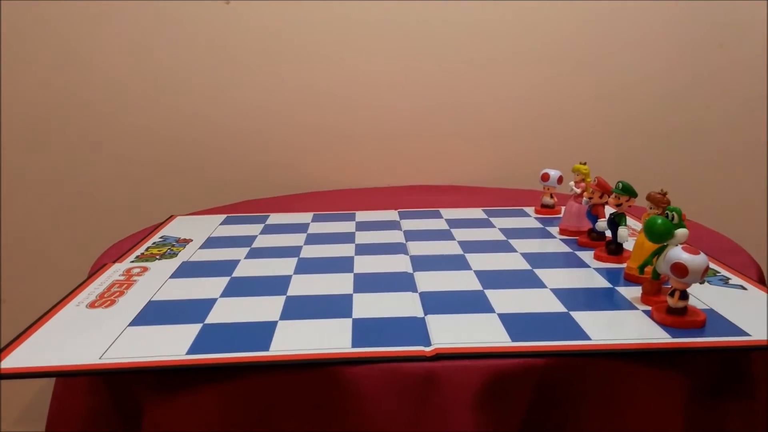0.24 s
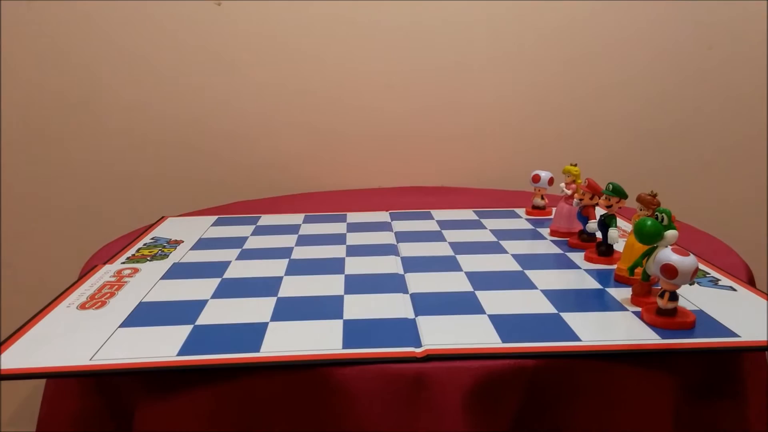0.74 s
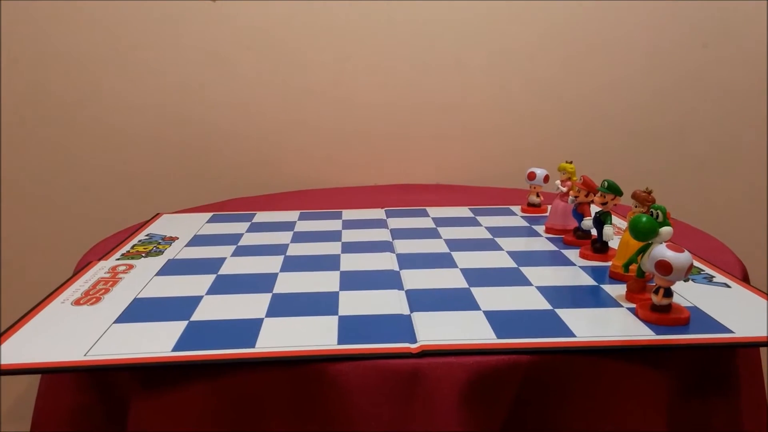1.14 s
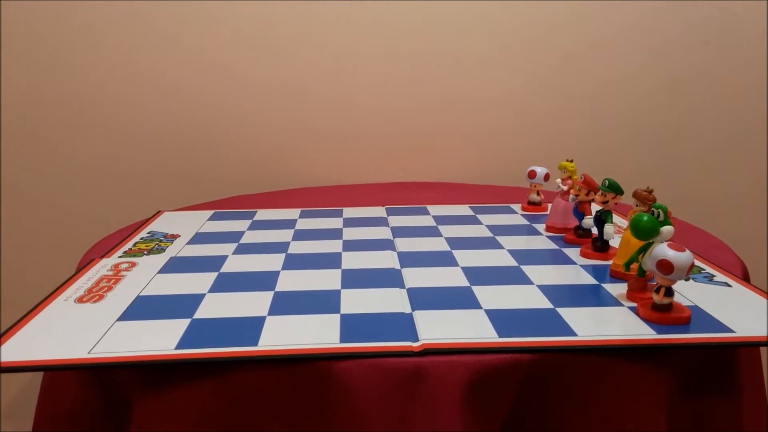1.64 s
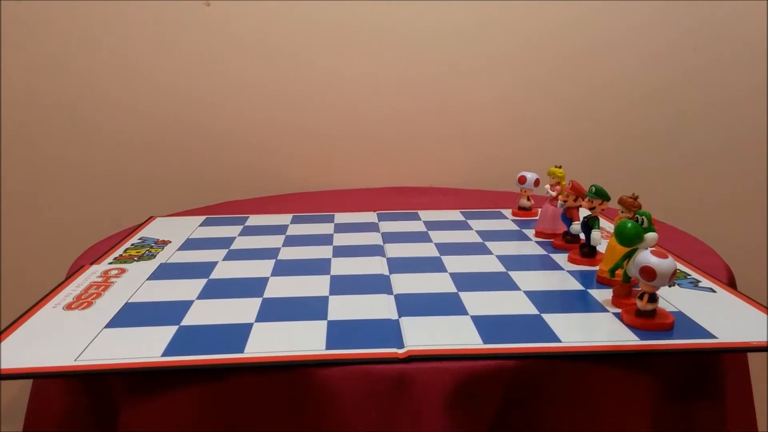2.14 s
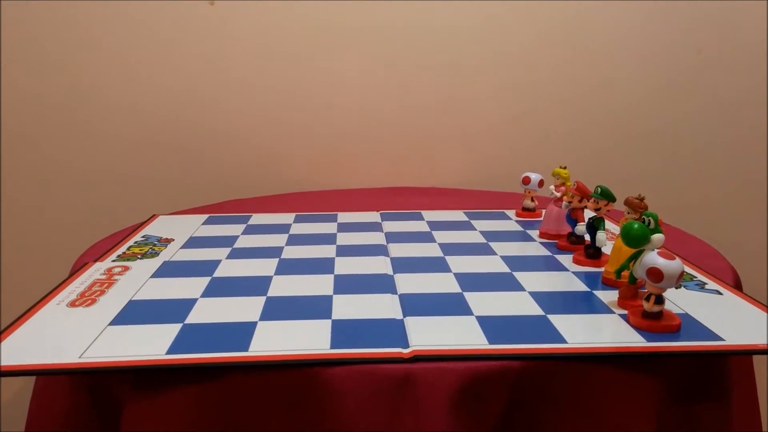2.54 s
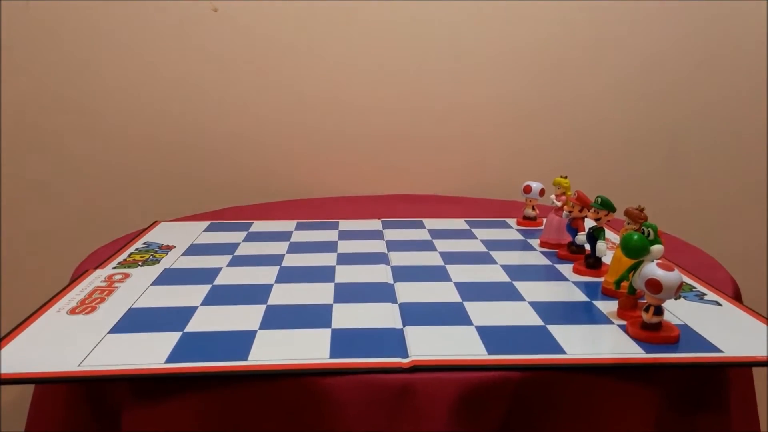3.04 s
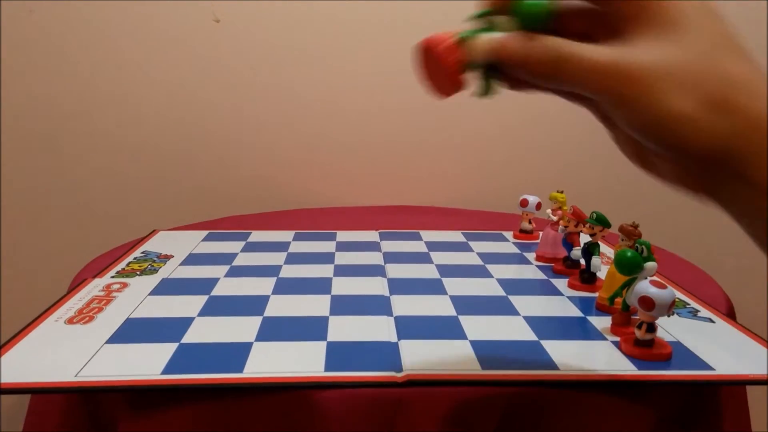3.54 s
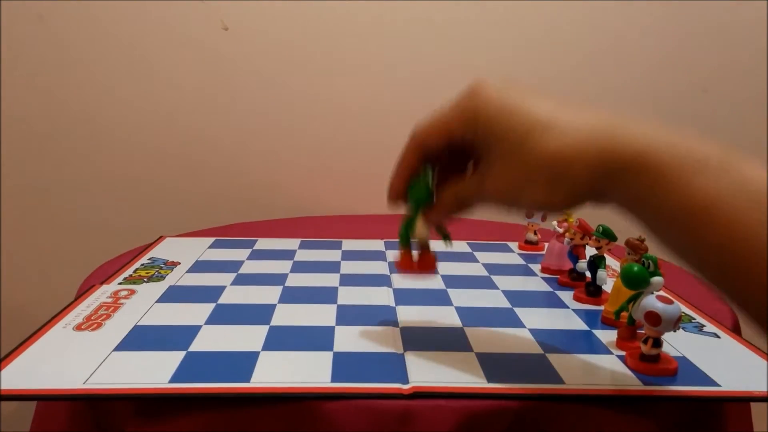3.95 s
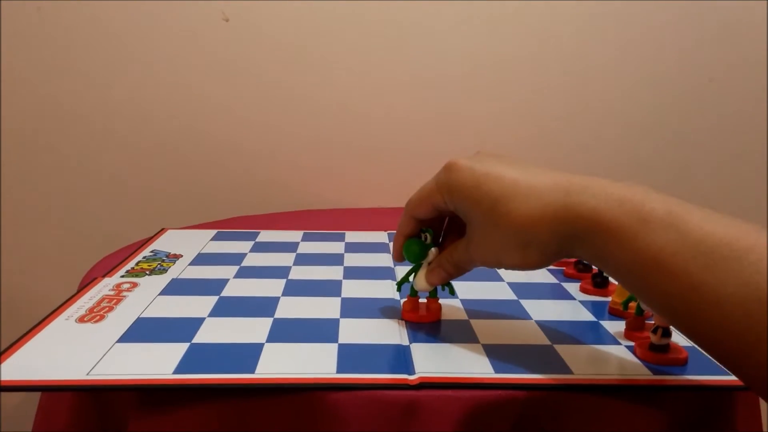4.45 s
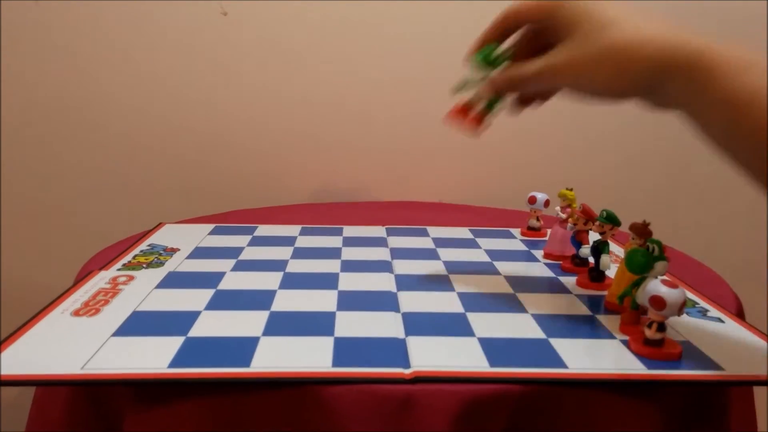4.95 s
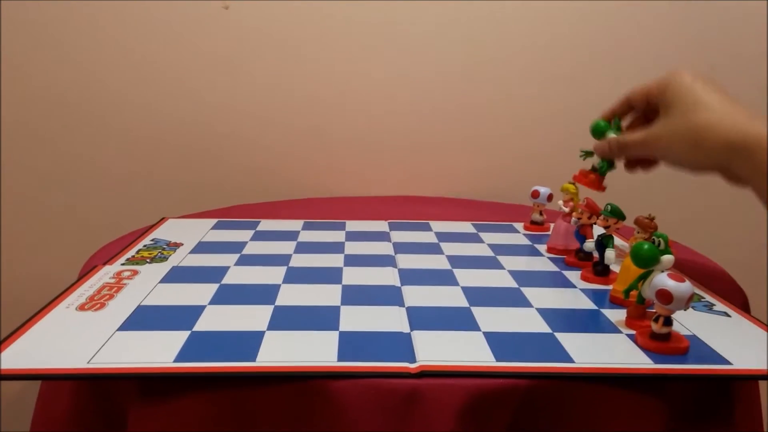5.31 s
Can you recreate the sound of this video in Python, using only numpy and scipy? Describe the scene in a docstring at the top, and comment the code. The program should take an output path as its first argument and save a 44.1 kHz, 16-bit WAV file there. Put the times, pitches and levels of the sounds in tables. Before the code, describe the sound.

A small quiet room with faint low air and soft hiss, picked up closely in stereo. From 0 to 0.5 s, dull fleshy bumps on a camera case mix with a weak scrape and small clicks. At about 0.6 s a hollow plastic piece clicks on a folding board, with more sharp clicks and a tiny clink at 0.8-0.95 s. From 1.05 to 1.45 s a base drags scratchily, catching in little ticks; a cluster of clicks follows around 1.5-1.7 s. The loudest knock lands at 1.74 s, hard and woody, rattling until 1.85 s. Light taps and scrapes come near 2.0-2.1 s, then near quiet, with barely audible thin whistles. Soft bumps return at 2.9 and 3.3 s, low thumps around 3.85 s. At 4.34 s a piece taps down, duller and slightly left. Gentle bumps follow near 4.8-4.95 s, and a stronger hollow handling bump closes at 5.5 s.

```python
"""Soft scrapes of sliding bases and dull hand bumps on a camera case open over quiet room air.
Hollow plastic chess figurines then click about a folding board; one knocks down hard and rattles,
and later one is tapped onto a square. Catches flick the board, clinks ping, and faint whistles arch by.
Hits are decaying modes with noise cracks, slides are trains of tiny slips that ring the board,
whistles are gliding sines, and a small room answers with early echoes and a diffuse tail."""
import sys
import numpy as np
from scipy import signal
from scipy.fft import rfft, irfft, next_fast_len
from scipy.io import wavfile
from scipy.ndimage import uniform_filter1d

SR = 44100
rng = np.random.default_rng(int(sys.argv[2]) if len(sys.argv) > 2 else 0)


def materialize(psi):
    """Save the field psi as 16-bit PCM at rate SR to the path in sys.argv[1].

    A 1-D psi becomes a single channel; in a 2-D psi each row is a channel.
    """
    bounded = np.clip(np.atleast_2d(psi).T, -1, 1)
    quanta = np.round(bounded * 32767).astype(np.int16)
    wavfile.write(sys.argv[1], SR, quanta)


N = 245945  # length of the scene [samples]
RING_T = np.arange(4096) / SR  # time axis of a single hit [s]
BLOW_S = 0.01  # opening stretch over which a hit's level is set [s]


def amp(db):
    """Turns decibels into gain."""
    return 10 ** (np.asarray(db) / 20)


def evened(x):
    """Scales a signal to unit rms."""
    return x / np.sqrt(np.mean(x ** 2) + 1e-30)


def blow(x):
    """Scales a hit to unit rms over its first moments."""
    opening = x[..., :int(BLOW_S * SR)]
    return x / np.sqrt(np.mean(opening ** 2) + 1e-30)


def read(points, hz):
    """Reads a table on a log-frequency axis."""
    f, value = np.transpose(points)
    return np.interp(np.log(hz + 1), np.log(f + 1), value)


def add(mix, s, sound):
    """Mixes a sound in at time s [s]."""
    part = mix[:, max(round(s * SR), 0):][:, :sound.shape[1]]
    part += sound[:, :part.shape[1]]


def pair(x, colour, likeness, tilt_db=0):
    """Colours two unrelated signals and blends them into what two close microphones hear."""
    size = next_fast_len(x.shape[1], True)
    a, b = rfft(x, size)
    hz = np.fft.rfftfreq(size, 1 / SR)
    same = np.clip(read(likeness, hz), 0, 1)
    # the tilt [dB/octave] acts above 7 kHz
    top_db = tilt_db * np.log2(np.maximum(hz / 7000, 1))
    gain = amp(read(colour, hz) + top_db)
    blended = same * a + np.sqrt(1 - same ** 2) * b
    return irfft(np.array([a, blended]) * gain, size)[:, :x.shape[1]]


# left-right likeness of sounds close by: (frequency [Hz], likeness [0-1])
NEAR_LIKENESS = [(150, 0.94), (700, 0.94), (1500, 1), (4000, 0.33), (9000, 0.1), (16000, 0.29)]


def ring(modes, emphasis_db=0, contact_s=0.00014, scatter=0.00395):
    """One blow on decaying modes; their shares, signs and tuning vary from blow to blow."""
    hz, db, t60 = np.transpose(modes)
    share, sign, detune, apart = rng.standard_normal((4, len(modes)))
    size = amp(db + emphasis_db + 1.2 * share) * np.sign(sign)
    # high modes reach the two microphones out of step
    skew = apart * np.sqrt(-0.5 * np.log(np.clip(read(NEAR_LIKENESS, hz), 0.05, 1)))
    poles = 2j * np.pi * hz * (1 + scatter * detune) - np.log(1000) / t60
    swings = np.vander(np.exp(poles / SR), len(RING_T), increasing=True)
    phased = size * np.exp(1j * np.array([skew, -skew]))
    sound = np.einsum("cm,mt->ct", phased, swings).imag
    return blow(sound * (1 - np.exp(-(RING_T / contact_s) ** 2)))


def burst(colour, rise_s, fall_s, tilt_db=0):
    """A short crack of coloured noise; the tilt dulls or brightens its top."""
    noise = pair(rng.standard_normal((2, len(RING_T))), colour, NEAR_LIKENESS, tilt_db)
    rise = 1 - np.exp(-(RING_T / rise_s) ** 2)
    return blow(noise * rise * np.exp(-RING_T / fall_s))


# where the pieces are: (time [s], lead of the left microphone [ms], left over right [dB])
PIECE_PLACES = [(0.498, .19, 0), (2.1, .19, 0), (4.3, .03, 3)]


def placed(sound, s):
    """The nearer microphone hears a piece sooner, and louder where the level leans."""
    times, lead_ms, pan_db = np.transpose(PIECE_PLACES)
    lag = round(abs(np.interp(s, times, lead_ms)) * SR / 1000)
    gain = amp(np.interp(s, times, pan_db) / 2)
    late = np.pad(sound[1], (lag, 0))[:sound.shape[1]]
    return np.array([sound[0] * gain, late / gain])


def octaves(modes, hz):
    """How far each mode lies above a pitch [octaves]."""
    return np.log2(np.transpose(modes)[0] / hz)


AIR_DB = -65.5  # overall rms level of the air [dB]
# spectrum of room air and microphone hiss: (frequency [Hz], relative level [dB per Hz])
AIR_SPECTRUM = [(12, -34.5), (20, -3), (33, -21), (86, -1.5), (182, -7), (260, -3), (350, -2.5),
                (558, -5.5), (738, -7), (976, -9), (1440, -10.5), (1910, -10), (3250, -13), (8410, -22),
                (9400, -23), (16000, -32)]
# left-right likeness of the air: (frequency [Hz], likeness [0-1])
AIR_LIKENESS = [(30, 0.4), (100, 0.5), (300, 0.52), (800, 0), (2000, 0), (8000, 0.01)]


def air():
    """Steady room air and microphone hiss, as shaped noise."""
    return amp(AIR_DB) * evened(pair(rng.standard_normal((2, N)), AIR_SPECTRUM, AIR_LIKENESS))


# rise and fall of a stroke [shares of its length]
STROKE_RISE, STROKE_FALL = 0.41, 0.24
# bases sliding and fingers rubbing on the figures:
# (start [s], length [s], scrape level before trim [dB], hiss level before trim [dB])
SLIDE_STROKES = [(0.01, 0.53, -66.5, -83), (0.769, 0.27, -56.5, -82), (0.998, 0.086, -69, -83),
                 (1.045, 0.41, -52, -64.5), (1.422, 0.21, -53, -70), (1.627, 0.14, -56, -80),
                 (1.974, 0.25, -61, -74.5), (2.15, 0.223, -68.5, -84), (2.808, 0.23, -73, -72),
                 (3.266, 0.11, -74, -76), (3.52, 0.99, -70, -74)]


def strokes():
    """Levels of scrape and hiss as each stroke gathers speed, holds and slows."""
    t, gains = np.arange(N) / SR, np.zeros((2, N))
    for s, length, scrape_db, hiss_db in SLIDE_STROKES:
        u = (t - s) / length
        swell = np.clip(np.minimum(u / STROKE_RISE, (1 - u) / STROKE_FALL), 0, 1)
        gains += amp([[scrape_db], [hiss_db]]) * swell
    return gains


# a sliding base wanders over spots between these pitches [Hz]
SLIDE_LOW_HZ, SLIDE_HIGH_HZ = 700, 1600
# modes of the folding board: (frequency [Hz], relative level [dB], decay time t60 [s])
BOARD_MODES = [(412, -3, 0.15), (468, 2.5, 0.063), (543, -1.5, 0.096), (627, 0, .045), (732, 1, 0.052),
               (847, -0.5, 0.027), (983, -0.5, 0.026), (1173, 2.5, 0.025), (1330, 3, 0.022),
               (1393, 0.5, 0.018), (1537, -3.5, 0.03), (1605, -1.5, 0.026), (1740, -7.5, 0.023),
               (1844, -12, 0.016)]


def wandering_board(grain, focus_db=16, count=6):
    """The slips ring the board, whose strongest modes change as the base travels from spot to spot."""
    wander = evened(uniform_filter1d(rng.standard_normal(N), size=1100))
    spot = np.clip(np.round((count - 1) * (0.5 + 0.35 * wander)), 0, count - 1)
    total = np.zeros((2, N))
    for k, hz in enumerate(np.geomspace(SLIDE_LOW_HZ, SLIDE_HIGH_HZ, count)):
        sound = ring(BOARD_MODES, -focus_db * abs(octaves(BOARD_MODES, hz)), scatter=0.0077)
        total += signal.oaconvolve(grain * (spot == k), sound, axes=1)[:, :N]
    return evened(total)


SLIPS_PER_S = 1000  # mean rate of the tiny slips [1/s]
# spectrum of the scrape: (frequency [Hz], relative level [dB per Hz])
SCRAPE_SPECTRUM = [(88, -48.5), (150, -8.5), (235, -14.5), (325, 8.5), (409, -30.5), (449, -0.5),
                   (592, -2.5), (650, 2.5), (794, -3), (927, 5), (1260, -9), (2070, -5.5), (6000, -28),
                   (7800, -52), (13200, -120)]
# spectrum of the fine rubbing hiss: (frequency [Hz], relative level [dB per Hz])
HISS_SPECTRUM = [(1500, -8.5), (3500, 1), (5000, 0), (7500, -4), (9400, 3.5), (11000, -2.5), (16000, -7)]
# left-right likeness of diffuse sound, for the hiss and the room: (frequency [Hz], likeness [0-1])
ROOM_LIKENESS = [(150, 0.94), (500, 0.9), (1200, 0.29), (2500, 0.047), (16000, 0.0093)]


def slides(spread_db=2.7, catch_db=1.7, ring_db=-1):
    """Tiny slips of uneven size set the board ringing, with a fine hiss from the rubbing surfaces."""
    scrape_gain, hiss_gain = strokes()
    # the slips swell and weaken as the bases catch and let go
    catch = amp(catch_db * evened(uniform_filter1d(rng.standard_normal(N), size=500)))
    slip_size = amp(spread_db * np.minimum(rng.exponential(1, N), 4))
    slips = (rng.random(N) < SLIPS_PER_S / SR) * slip_size
    grain = evened(slips * catch * rng.standard_normal((2, N)))
    rough = grain + 0.45 * catch * rng.standard_normal((2, N))
    rub = evened(pair(rough, SCRAPE_SPECTRUM, NEAR_LIKENESS))
    scrape = evened(rub + amp(ring_db) * wandering_board(grain[:1]))
    fine = grain + 1.5 * rng.standard_normal((2, N))
    hiss = evened(pair(fine, HISS_SPECTRUM, ROOM_LIKENESS))
    # the trims set scrape against hiss
    return placed(amp(-0.5) * scrape_gain * scrape + amp(5.0) * hiss_gain * hiss, 0)


# a bump's second push: delay [s] and pitch ratio; the skin's rub against the case note [dB]
SETTLE_S, SETTLE_PITCH, RUB_DB = 0.011, 0.953, -8.5
# modes of the camera case, before the grip shifts them: (frequency [Hz], relative level [dB], t60 [s])
CASE_MODES = [(380, -7, .03), (442, 0, .055), (495, -2, .03), (590, -10, .02)]
# modes of the low thump: (frequency [Hz], relative level [dB], t60 [s])
THUMP_MODES = [(132, -15, 0.082), (158.5, 9, 0.069), (246, 6, 0.059)]
# spectrum of skin rubbing the case: (frequency [Hz], relative level [dB per Hz])
RUB_SPECTRUM = [(300, -35), (800, 7), (1250, 6.5), (2000, -4), (4000, -9.5), (9000, -19), (16000, -23)]
# dull bumps of the hand on the camera:
# (time [s], case level [dB], thump over case [dB], settling of the grip over case [dB], pitch [ratio])
HAND_BUMPS = [(0.017, -53, -14, -14, 1), (0.087, -51.5, -12, -10, 1), (0.147, -58, -12, 4.5, 1),
              (0.204, -51.5, -23, -1, 1), (0.399, -64, -6, 0, 0.93), (0.483, -60, -15, 0, 1),
              (2.88, -66, -14, 0, 0.93), (3.32, -63, -12, -1.5, 0.75), (3.75, -65.5, -3, -1, 0.71),
              (3.851, -50.5, 12.5, -3.5, 1), (3.898, -53, 1, -13, 1), (4.11, -58.5, -5.5, -8, 0.94),
              (4.219, -64, 4, -2, 0.75), (4.821, -57.5, -12, -22, 1), (4.945, -60, -20, 1, 0.73),
              (5.513, -41.5, -26, 4, 0.95), (5.555, -48.5, -19.5, 11.5, 0.91)]


def bumps():
    """Soft flesh hardly reaches the treble: the case notes hollowly, then lower as the grip settles."""
    out = np.zeros((2, N))
    for s, case_db, thump_db, settle_db, grip in HAND_BUMPS:
        rub = burst(RUB_SPECTRUM, rise_s=0.0008, fall_s=0.009)
        add(out, s, amp(case_db + RUB_DB) * rub)
        pushes = (0, case_db, grip), (SETTLE_S, case_db + settle_db, grip * SETTLE_PITCH)
        for after_s, db, pitch in pushes:
            thump = amp(thump_db) * ring(THUMP_MODES, contact_s=0.0036)
            gripped = [(hz * pitch, level, t60) for hz, level, t60 in CASE_MODES]
            case = ring(gripped, contact_s=0.0022, scatter=0.06)
            add(out, s + after_s, amp(db) * (thump + case))
    return out


# the board's push: damping [cycles] and rise [s]
PUSH_CYCLES, PUSH_RISE_S = 0.88, 0.0003


def push(hz):
    """The board gives way in a few heavily damped swings, which carry the woody body of a tap."""
    turns = hz * RING_T
    rise = 1 - np.exp(-(RING_T / PUSH_RISE_S) ** 2)
    return blow(np.sin(2 * np.pi * turns) * np.exp(-turns / PUSH_CYCLES) * rise)


# the board's ring and push, and the figure's ring and clack, within their own layers [dB]
BOARD_RING_DB, PUSH_DB, RING_DB, CLACK_DB = -1, -5, -8, -0.5
# board level lost away from the touched spot's pitch [dB/octave]
SPOT_FOCUS_DB = 9
# a harder snap gathers the clack around the figure's pitch [dB/octave per dB]
SNAP_FOCUS = 2.5
# modes of the small table: (frequency [Hz], relative level [dB], t60 [s])
TABLE_MODES = [(140, -19, .06), (168, -12, .07), (212, -4, .07), (236, -6, .06), (293, 0, .08),
               (335, -1, .06), (378, 0, .06)]
# modes of a hollow figure: (frequency [Hz], relative level [dB], t60 [s])
FIGURE_MODES = [(1800, 12, 0.017), (2040, -9, 0.04), (2480, -1.5, 0.0062), (2620, 6.5, 0.026),
                (2700, 4.5, 0.018), (2800, -10.5, 0.027), (3210, -11, 0.014), (3560, -12.5, 0.014),
                (4028, 1.5, 0.04), (4560, 4.5, 0.016), (5200, -3.5, 0.035), (5110, -9.5, 0.011),
                (5170, 0, 0.011), (6100, -6, 0.0068)]
# crowd of weak modes around a figure's pitch: (multiple of that pitch [ratio], level before focus [dB])
CLACK_CROWD = [(.3, -22.5), (.6, 2.5), (.8, -2), (0.999, -1), (1.2, -4), (1.45, -11.5), (2.401, -26.5),
               (4, -39)]
# spectrum of the hard tick, before tilt: (frequency [Hz], relative level [dB per Hz])
TICK_SPECTRUM = [(2000, -18.5), (5000, 4), (6000, 1.5), (6900, 1.5), (7800, -12), (9200, 8), (10000, 5.5),
                 (10800, -2), (13000, 0), (16000, -5.5)]


def contact(table_db, board_db, board_tilt_db, spot_hz, figure_db, figure_hz, tick_db, tick_tilt_db,
            snap_db=0, focus_db=15):
    """A hard base ticks, the hollow figure clacks, the board gives and rings, and the table thuds."""
    # each figure sounds most strongly near its own pitch
    shape_db = -focus_db * abs(octaves(FIGURE_MODES, figure_hz))
    gather_db = SNAP_FOCUS * max(snap_db, 0)
    crowd = [(multiple * figure_hz, db - gather_db * abs(np.log2(multiple)))
             for multiple, db in CLACK_CROWD]
    spot_db = board_tilt_db * octaves(BOARD_MODES, 1000)
    spot_db = spot_db - SPOT_FOCUS_DB * abs(octaves(BOARD_MODES, spot_hz))

    table = ring(TABLE_MODES, contact_s=0.0031)
    board = ring(BOARD_MODES, spot_db, contact_s=0.0007, scatter=0.012)
    shell = ring(FIGURE_MODES, shape_db, contact_s=0.001, scatter=0.03)
    clack = burst(crowd, rise_s=0.001, fall_s=0.003 * amp(-snap_db))
    tick = burst(TICK_SPECTRUM, rise_s=0.0012, fall_s=0.0013, tilt_db=tick_tilt_db)

    wood = amp(BOARD_RING_DB) * board + amp(PUSH_DB) * push(spot_hz)
    body = amp(table_db) * table + amp(board_db) * wood
    # snap trades the longer ring for a brief clack
    figure = amp(RING_DB - snap_db) * shell + amp(CLACK_DB + snap_db / 2) * clack
    return body + amp(figure_db) * figure + amp(tick_db) * tick


# levels against the force of a blow at middling hardness and weight [dB]
TABLE_DB, FIGURE_DB, TICK_DB = -17.5, -5, -14.5
# tilts at middling weight and sharpness [dB/octave]
BOARD_TILT_DB, TICK_TILT_DB = 3, -6.5
# a harder contact clacks more and snaps more [dB per dB]
CLACK_PER_HARDNESS, SNAP_PER_HARDNESS = 0.42, 0.78
# weight darkens board and tick, a sharp edge brightens the tick [dB/octave per dB]
BOARD_DULLING, TICK_DULLING, TICK_BRIGHTENING = 0.5, 0.17, 0.6
# edge touch before the main hit and rock after it: offset [s], level [dB], change of hardness [dB]
EDGE_S, EDGE_DB, EDGE_SOFTER_DB = 0.0022, -15, -12.5
ROCK_S, ROCK_DB, ROCK_SOFTER_DB = 0.0105, -12, -13
# a piece meets the board or clicks in the fingers: (time [s], force [dB], hardness of the contact [dB], #
# weight behind it [dB], sharpness of the edge [dB], figure pitch [Hz], board pitch at that spot [Hz])
PIECE_KNOCKS = [(0.282, -52, 2, 8, -0.5, 2070, 1130), (0.31, -48.5, -2.5, 3.5, -1, 3370, 1150),
                (0.378, -69.5, 12.5, 2, -12, 3400, 1000), (0.574, -54.5, -10, 2, -4, 2400, 750),
                (0.5857, -38.5, 3, -6, -2.5, 2150, 880), (0.5906, -38, 2.5, -9, -10, 3300, 900),
                (0.79, -39.5, -6.5, -1, 9, 3470, 906), (0.804, -43, 4, -5, 5, 2690, 960),
                (0.851, -50.5, 4.5, -14, -0.5, 2700, 1000), (0.9113, -38, 3, -17, 8, 4350, 1170),
                (0.9452, -48.5, 4.5, -12, -5, 4870, 1090), (0.957, -50, 5, 3, -1, 2560, 590),
                (1.045, -58.5, -2, 15, 0, 2240, 900), (1.417, -47.5, 0, -7, -15, 2540, 1000),
                (1.4492, -45, 0, 6.5, -0.5, 2430, 1000), (1.506, -46, 0, -8, -4, 2250, 1000),
                (1.517, -49, -10, 15, -3, 3020, 912), (1.539, -46.5, -21, 13.5, 5, 3480, 890),
                (1.547, -40.5, -3.5, 0.5, 11, 3330, 1000), (1.569, -46.5, -4, 5, 4, 3120, 885),
                (1.637, -43.5, -5, 10, -4, 2700, 760), (1.645, -42.5, -4.5, 5, 2.5, 3240, 1000),
                (1.665, -38.5, -13, 10.5, 5, 1970, 700), (1.677, -46, -4, 1, -4.5, 2120, 1000),
                (1.7436, -21, 1, 0.5, 0, 3250, 755), (1.7455, -28, 7, 3.5, -5, 2400, 1000),
                (1.7546, -37, 4, -9, -5, 2500, 950), (1.7615, -52, -3, -4, -12, 4104, 1300),
                (1.765, -48, -6, 11, -9.5, 2603, 793), (1.787, -36.5, 1, 6, 2, 4000, 900),
                (1.797, -27.5, 1.5, -14, 5, 3300, 1290), (1.81, -49, 8, -12, 2, 3600, 1000),
                (1.8225, -27, -8, 3.5, -3, 2630, 805), (1.8264, -34, -11, -6, 0, 3850, 880),
                (1.835, -32.5, -2.5, -2, -3, 3200, 1130), (1.839, -42.5, 2.5, -15, 6, 4100, 1300),
                (1.8434, -34, -0.5, -7, 1.5, 4000, 1280), (2.0242, -50.5, -8, 1, -1, 2440, 950),
                (2.0365, -63, 12.5, -2, -8, 3700, 1000), (2.0462, -44.5, 7, 3, -7.5, 2700, 950),
                (2.053, -46.5, -1, 0, -12, 2590, 815), (2.0547, -44.5, -8, 5, -10, 2700, 700),
                (2.0978, -50.5, 8, -2, -26, 2720, 1000), (2.0995, -43, -8, 10.5, -2, 2800, 586),
                (2.122, -55, -13, 8, -8, 2800, 520), (2.319, -57, -9, -1, 3, 3220, 940),
                (2.854, -69, 14.5, 5, 7.5, 4930, 1000), (3.232, -60, -8, -3, 3, 2560, 900),
                (3.855, -62, 8, 2, -21, 1800, 1000), (3.865, -54.5, 0, 13, -16, 1800, 1000),
                (3.897, -59.5, 4.5, -14, 1, 2200, 1220), (3.916, -64, 10.5, 6, 2, 2540, 1200),
                (3.959, -72, 14, 0, -10, 1900, 1400), (4.34, -42.5, 4.5, 6.5, -3.5, 1390, 436),
                (4.347, -50, 8, 7, -13, 1310, 418), (4.356, -49, 3, 10, -7, 2700, 420),
                (4.3647, -52, 9.5, 10.5, -14, 1400, 380)]


def knocks():
    """Each hard contact has a weak edge touch, the main hit, then a weak rock; hardness brings out figure and
    tick, weight the table."""
    out = np.zeros((2, N))
    touches = (-EDGE_S, EDGE_DB, EDGE_SOFTER_DB), (0, 0, 0), (ROCK_S, ROCK_DB, ROCK_SOFTER_DB)
    for s, force_db, hardness_db, weight_db, sharp_db, figure_hz, spot_hz in PIECE_KNOCKS:
        board_tilt_db = BOARD_TILT_DB - BOARD_DULLING * weight_db
        tick_tilt_db = TICK_TILT_DB - TICK_DULLING * weight_db + TICK_BRIGHTENING * sharp_db
        for after_s, weaker_db, softer_db in touches:
            hard_db = hardness_db + softer_db
            sound = contact(table_db=TABLE_DB + weight_db,
                            board_db=-1.0, board_tilt_db=board_tilt_db, spot_hz=spot_hz,
                            figure_db=FIGURE_DB + CLACK_PER_HARDNESS * hard_db, figure_hz=figure_hz,
                            snap_db=SNAP_PER_HARDNESS * hard_db,
                            tick_db=TICK_DB + hard_db + sharp_db, tick_tilt_db=tick_tilt_db)
            add(out, s + after_s, amp(force_db + weaker_db) * placed(sound, s))
    return out


# a dragged base catches and jumps: (time [s], level [dB], tick against that level [dB])
BASE_CATCHES = [(0.889, -60, -18), (1.109, -55, -24), (1.128, -47, -13), (1.164, -47.5, -12),
                (1.217, -45, -9), (1.228, -43.5, -13), (1.247, -52, -8), (1.268, -40, -21),
                (1.2703, -42, -23), (1.344, -52, -4.5), (1.356, -55, -21), (1.368, -50.5, -25),
                (1.706, -50.5, -21.5), (2.01, -55, -21), (2.081, -50, -14)]


def catches():
    """A base that catches flicks the board with a bright tick, while the fingers damp the figure."""
    out = np.zeros((2, N))
    for s, db, tick_db in BASE_CATCHES:
        sound = contact(table_db=-24.0, board_db=-3, board_tilt_db=0.5, spot_hz=1000,
                        figure_db=-22.0, figure_hz=2720, tick_db=tick_db, tick_tilt_db=10.5)
        add(out, s, amp(db) * placed(sound, s))
    return out


# time constants of the ping's pitch sag, rise and bright start [s]
SAG_S, PING_RISE_S, PING_FALL_S = 0.002, 0.0007, 0.0008
# the weaker ring that lingers: level [dB] and time constant [s]
LINGER_DB, LINGER_S = -18, 0.005
# one figure clinks against another: (time [s], level [dB], first pitch [Hz], last pitch [Hz])
FIGURE_CLINKS = [(.9121, -36, 5800, 3650), (1.5465, -50, 5300, 4000), (1.7452, -32, 5100, 3600),
                 (1.7875, -47, 5200, 3900), (1.7982, -42, 5000, 3500), (2.0464, -50.5, 5600, 3850),
                 (2.0985, -58, 4600, 4000)]


def clinks():
    """Plastic on plastic: one bright resonance, stiffened by the contact, slides down as it dies."""
    out = np.zeros((2, N))
    rise = 1 - np.exp(-(RING_T / PING_RISE_S) ** 2)
    fall = np.exp(-RING_T / PING_FALL_S) + amp(LINGER_DB) * np.exp(-RING_T / LINGER_S)
    for s, db, first_hz, last_hz in FIGURE_CLINKS:
        hz = last_hz + (first_hz - last_hz) * np.exp(-RING_T / SAG_S)
        turns = np.cumsum(hz) / SR + rng.random()
        ping = blow(rise * fall * np.sin(2 * np.pi * turns))
        add(out, s, amp(db) * placed(np.array([ping, ping]), s))
    return out


# how the two microphones colour a near click: (frequency [Hz], left over right [dB])
PORT_LEAN = [(1000, 0), (2000, 0.5), (4000, 2.5), (8800, -11.5), (12000, 8), (16000, 2)]


def ports(x):
    """Shares the direct clicks between the two microphones, band by band."""
    size = next_fast_len(N + SR // 10, True)
    lean_db = read(PORT_LEAN, np.fft.rfftfreq(size, 1 / SR))
    return irfft(rfft(x, size) * amp(np.array([lean_db, -lean_db]) / 2), size)[:, :N]


# faint whistles: (start [s], length [s], first pitch [Hz], middle pitch [Hz], last pitch [Hz],
# rms waver [Hz], rms level [dB])
FAINT_WHISTLES = [(2.49, .25, 1930, 1880, 1900, 100, -75.5), (2.86, .13, 9350, 9400, 9500, 320, -76),
                  (3.3, .07, 9200, 9250, 9150, 260, -78), (3.87, .075, 9050, 9200, 9800, 100, -78),
                  (3.93, .12, 9650, 10280, 9350, 80, -76), (4.01, .09, 10300, 10450, 10650, 80, -82),
                  (4.028, .052, 8980, 8870, 8700, 60, -69), (4.09, .045, 9700, 9760, 9680, 60, -75),
                  (4.14, .11, 8820, 9400, 8800, 60, -77), (4.15, .15, 9400, 9690, 9230, 100, -79),
                  (4.16, .065, 8500, 8740, 8560, 50, -77), (4.29, .05, 8560, 8760, 8740, 45, -75),
                  (4.41, .14, 8250, 8990, 8400, 55, -80)]


def whistles():
    """Each faint whistle is a sine that swells and fades while its pitch arches and wavers."""
    out = np.zeros((2, N))
    for s, length, first_hz, middle_hz, last_hz, waver_hz, db in FAINT_WHISTLES:
        u = np.linspace(-1, 1, round(length * SR))
        slope = (last_hz - first_hz) / 2
        bend = (first_hz + last_hz) / 2 - middle_hz
        arch = middle_hz + slope * u + bend * u ** 2
        waver = evened(uniform_filter1d(rng.standard_normal(len(u)), size=100))
        turns = np.cumsum(arch + waver_hz * waver) / SR
        # each side starts at its own phase, within a quarter turn
        phase = 2 * np.pi * (turns + rng.random((2, 1)) / 4)
        add(out, s, amp(db) * evened(np.sin(phase) * (1 - u ** 4)))
    return out


# decay of the room: (frequency [Hz], t60 [s])
ROOM_DECAY = [(150, 0.29), (600, 0.37), (2000, 0.28), (5000, 0.29), (14000, 0.26)]
# colour of the room's tail: (frequency [Hz], level [dB])
ROOM_COLOUR = [(150, -1), (600, -9.5), (2000, -9), (5000, -12.5), (14000, -10.5)]


def room(x, early_db=-10.5, early_s=0.009, gap_s=0.004):
    """The board, table and near wall answer after a short gap; then a short diffuse tail builds."""
    t = np.arange(SR // 2) / SR
    # sparse random echoes, about 3000 a second
    taps = rng.choice([-1., 1.], (2, len(t))) * (rng.random((2, len(t))) < 3000 / SR)
    taps = evened(taps) * (t > gap_s)
    early = pair(taps * np.exp(-t / early_s), [(100, 0.0045), (16000, 0.0019)], ROOM_LIKENESS)
    early *= amp(early_db) / np.linalg.norm(early[0])
    # each band of the tail dies at its own rate
    noise = pair(rng.standard_normal((2, len(t))), ROOM_COLOUR, ROOM_LIKENESS)
    hz, at, z = signal.stft(noise, SR, nperseg=256)
    rate = np.log(1000) / read(ROOM_DECAY, hz)[:, None]
    decayed = z * np.exp(-rate * at) * np.sqrt(2 * rate / SR)
    tail = signal.istft(decayed, SR, nperseg=256)[1][:, :len(t)]
    tail *= 1 - np.exp(-(t / 0.012) ** 2)
    return signal.fftconvolve(x, early + tail, axes=1)[:, :N]


def without_bass(x, hz):
    """Such small bodies radiate little deep bass."""
    return signal.sosfilt(signal.butter(4, hz, "highpass", fs=SR, output="sos"), x)


def scene(board_bass_hz=140, hand_bass_hz=125):
    """Pieces and bumps in the room, with faint whistles, over its quiet air."""
    clicks = ports(knocks() + clinks() + catches())
    pieces = without_bass(clicks + slides(), board_bass_hz)
    hand = without_bass(bumps(), hand_bass_hz)
    # the bumps excite the room half as strongly
    return pieces + hand + room(pieces + hand / 2) + whistles() + air()


EDGE_HZ = 15900  # upper band limit [Hz]


def record(dry):
    """The recorder's band limit, a steep low-pass."""
    lowpass = signal.firwin(511, EDGE_HZ, window=("kaiser", 9), fs=SR)
    return signal.oaconvolve(dry, lowpass[None], "same")


dry = scene()
out = record(dry)
materialize(out)
```